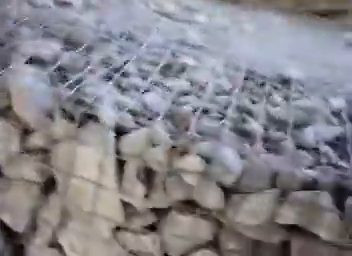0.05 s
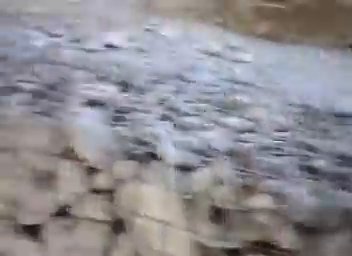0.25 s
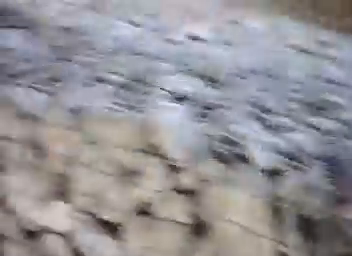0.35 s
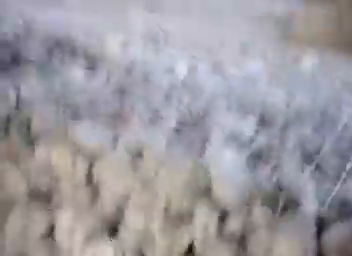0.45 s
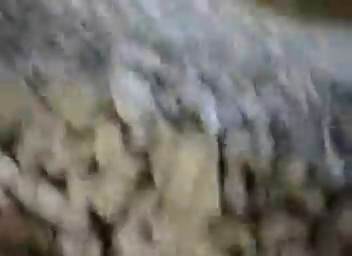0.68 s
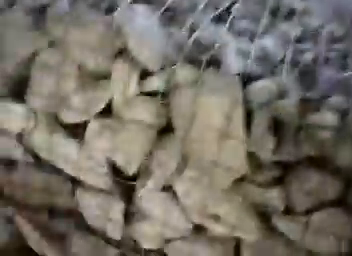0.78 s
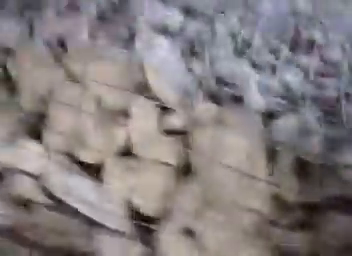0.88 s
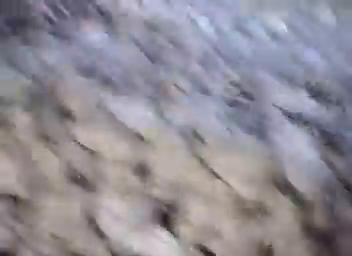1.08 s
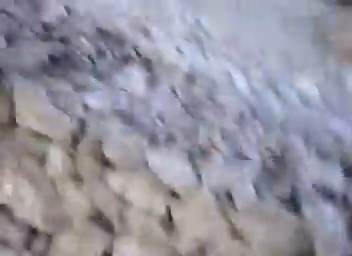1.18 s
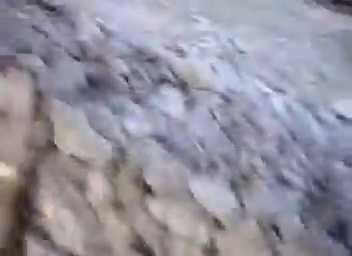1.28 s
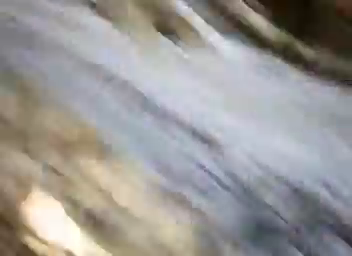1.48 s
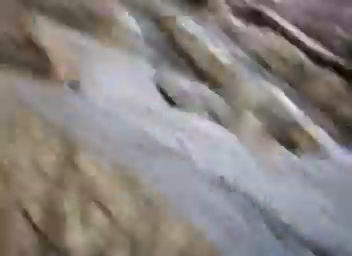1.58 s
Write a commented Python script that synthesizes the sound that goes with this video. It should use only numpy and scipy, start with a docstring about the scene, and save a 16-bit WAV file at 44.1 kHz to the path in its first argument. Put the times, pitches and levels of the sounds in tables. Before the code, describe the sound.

A bicycle slams onto stony ground at about 0.2 seconds, with a loud bang of crunching stones, a low thud and clanking metal that overloads the small microphone. It bounces twice, near 0.3 and 0.4 seconds, and rattles to rest by 0.5. A dull echo fades off the slope. Quieter, steady wind runs from the start until about 1.5 seconds, with soft puffs. Everything sounds hollow and nasal.

```python
"""Steady wind, then a bicycle slams onto stony ground, bounces twice and rattles to rest.
Each blow layers a crunch of stones, a low thud and a clank of the ringing frame. Bright ticks sharpen
the crash, the slope throws back a dull wash, and soft puffs dot the wind. It all has the hollow, nasal
colour of a small camera's microphone, which overloads on the bang and holds coarse samples for grit."""
import sys
import numpy as np
from scipy.fft import rfft, irfft
from scipy.io import wavfile

SR = 44100
rng = np.random.default_rng(int(sys.argv[2]) if len(sys.argv) > 2 else 0)


def to_wav(sig):
    """Store sig (one row per channel, or 1-D mono) as 16-bit WAV at the path in sys.argv[1].

    Samples outside -1..1 are clipped; the rate is SR.
    """
    pcm = np.clip(np.atleast_2d(sig), -1, 1) * 32767
    pcm = np.round(pcm).astype(np.int16)
    wavfile.write(sys.argv[1], SR, pcm.T)  # frames by channels


N = 72765

# Noise colours, as relative spectral density: f/Hz, level/dB
WIND_SPECTRUM = [(20, -22.5), (65, -27), (140, -18), (310, -20.5), (480, -16.5), (640, -11), (790, -2),
                 (880, 0.5), (1050, -9), (1300, -16.5), (1550, -26), (1870, -15.5), (2250, -27),
                 (2700, -23.5), (3400, -23.5), (3950, -30)]  # hollow rush at the microphone
BUFFET_SPECTRUM = [(15, 13.5), (35, 0), (70, -10), (200, -31), (1000, -68)]  # rumble of a buffet
ECHO_SPECTRUM = [(30, -28.5), (170, -30), (280, -15), (480, -8), (820, -0.5), (1100, -4), (1500, -23.5),
                 (1850, -16.5), (2300, -32.5), (3100, -19), (3900, -45.5)]  # dull wash off the slope
CRUNCH_SPECTRUM = [(30, -46.5), (150, -31), (300, -25), (550, -11.5), (820, 2), (1100, -3.5), (1450, -17),
                   (1850, -6), (2300, -21), (3100, -11), (3900, -16.5)]  # stones giving way
THUD_SPECTRUM = [(15, 6), (35, -18.5), (70, -6.5), (140, -1.5), (240, -4.5), (500, -7.5), (2000, -64)]  # low body of a blow
# Low buffets of wind: t/s, length/s, level/dB
BUFFETS = [(0.861, 0.037, -41), (0.923, .17, -45)]
# Soft, hollow puffs: t/s, level/dB
PUFFS = [(0.574, -17.5), (0.628, -19), (0.642, -16), (1.035, -20.5), (1.388, -20.5), (1.469, -18)]
# Bright ticks, sharp in the crash and faint after it: t/s, level/dB
TICKS = [(0.2332, 8), (0.2362, 6.5), (0.2506, 6.5), (0.2556, 7.5), (0.2873, 3), (0.3695, 6), (0.972, -14),
         (1.083, -15.5)]
# Stones crushed and scraped under the bicycle: t/s, level/dB, decay/s, hump f/Hz, hump lift/dB
CRUNCHES = [(0.2140, 6, .012, 830, -6), (0.2282, 0.5, 0.022, 800, 6.5), (0.2420, -3.5, 0.0058, 780, 8.5),
            (0.2815, -2.5, 0.014, 1090, 4), (0.2890, -6, 0.013, 960, 5.5), (0.3142, -12, 0.0027, 890, 13),
            (0.3440, -16.5, 0.036, 676, 27), (0.36, -7, .007, 720, 12.5), (0.3690, -8, 0.0098, 710, 6.5),
            (0.3817, -11, 0.0027, 730, 27), (0.4050, -21.5, 0.026, 810, 0.5),
            (0.4290, -13.5, 0.029, 970, 8.5), (0.4660, -19, 0.01, 774, 14), (0.4870, -21, 0.016, 686, 12)]
# Ringing modes of the frame: f/Hz, level/dB
FRAME_MODES = [(235, -20.5), (328, -16), (456, -8), (550, -5.5), (682, -5), (790, -9.5), (828, -4.5),
               (885, -10), (957, -5), (1006, -13.5), (1088, -10), (1216, -27), (1290, -18.5), (1361, -9.5),
               (1535, -13.5), (1857, -18)]
# The frame hits the ground: t/s, ring level/dB, most excited f/Hz, spread/Hz, thud level/dB
STRIKES = [(0.2133, -1.5, 828, 13, -14), (0.2818, -10, 1020, 92, -23), (0.3624, -8.5, 781, 19, -41),
           (0.4275, -25, 985, 120, -45), (0.4870, -24, 731, 75, -32)]


def amp(db):
    """Decibels to gain."""
    return 10 ** (np.asarray(db) / 20)


def unit_rms(x):
    """Scales to rms 1."""
    return x / np.sqrt(np.mean(x ** 2) + 1e-20)


def add(mix, start_s, sound):
    """Drops a sound into the mix at its cue."""
    part = mix[max(round(start_s * SR), 0):][:len(sound)]
    part += sound[:len(part)]


def noise(spectrum, hump_hz=800, hump_db=0, width_octaves=0.34):
    """Coloured noise of rms 1; an optional broad hump makes it hollow."""
    hz = np.fft.rfftfreq(N, 1 / SR) + 1
    points_hz, points_db = np.transpose(spectrum)
    colour = np.interp(np.log(hz), np.log(points_hz), points_db)
    hump = hump_db * np.exp(-.5 * (np.log2(hz / hump_hz) / width_octaves) ** 2)
    return unit_rms(irfft(rfft(rng.standard_normal(N)) * amp(colour + hump), N))


def wobble(depth_db, length_s):
    """A gain that wanders at random on the given time scale."""
    hz = np.fft.rfftfreq(N, 1 / SR)
    drift = irfft(rfft(rng.standard_normal(N)) * np.exp(-(2 * hz * length_s) ** 2), N)
    return amp(depth_db * unit_rms(drift))


def wind(level_db=-29):
    """The bed: air rushes past the microphone, hollow and fluttering, with low buffets."""
    out = amp(level_db) * unit_rms(noise(WIND_SPECTRUM) * wobble(depth_db=.8, length_s=.01))
    for start_s, length_s, db in BUFFETS:
        swell = np.sqrt(abs(np.hanning(round(length_s * SR))))
        add(out, start_s, amp(db) * swell * noise(BUFFET_SPECTRUM)[:len(swell)])
    return out


def hollow_puffs(hz=821, peak_s=0.0029):
    """Soft, hollow puffs in the tail of the crash and in the wind."""
    t, out = np.arange(SR // 10) / SR, np.zeros(N)
    puff = t / peak_s * np.exp(1 - t / peak_s) * np.sin(2 * np.pi * hz * t)
    for start_s, db in PUFFS:
        add(out, start_s, amp(db) * puff)
    return out


def slope_echo(gain_db=-7, rise_s=0.12, t60_s=1.0):
    """The tail: a dull, dying wash of noise for the crash scattering back from the rocks."""
    t, out = np.arange(N) / SR, np.zeros(N)
    envelope = (1 - np.exp(-t / rise_s)) * amp(-60 * t / t60_s)
    crash_s = STRIKES[0][0]
    add(out, crash_s, amp(gain_db) * noise(ECHO_SPECTRUM) * envelope)
    return out


def bright_ticks(hz=2680, decay_s=0.000078):
    """Bright ticks that die within a cycle: a sharp cluster in the crash, two faint ones later."""
    t, out = np.arange(SR // 10) / SR, np.zeros(N)
    tick = 2 * np.sin(2 * np.pi * hz * t) * np.exp(-t / decay_s)
    for start_s, db in TICKS:
        add(out, start_s, amp(db) * tick)
    return out


def stone_crunches(rise_s=0.00027):
    """Stones give way under the bicycle in short, grainy bursts."""
    t, out = np.arange(N) / SR, np.zeros(N)
    for start_s, db, decay_s, hump_hz, hump_db in CRUNCHES:
        grit = noise(CRUNCH_SPECTRUM, hump_hz, hump_db) * wobble(depth_db=2.5, length_s=0.0011)
        envelope = (1 - np.exp(-t / rise_s)) * np.exp(-t / decay_s)
        add(out, start_s, amp(db) * unit_rms(grit) * envelope)
    return out


def frame_ring(favoured_hz, spread_hz, favour_db=15, scatter_db=2.5):
    """The clank: where the blow lands decides which of the frame's modes ring loudest."""
    t, out = np.arange(N) / SR, np.zeros(N)
    for hz, db in FRAME_MODES:
        lift_db = favour_db * np.exp(-.5 * ((hz - favoured_hz) / spread_hz) ** 2)
        lift_db += scatter_db * rng.standard_normal()
        t60_s = .15 * np.sqrt(800 / hz)  # higher modes die sooner
        out += amp(db + lift_db - 60 * t / t60_s) * np.sin(2 * np.pi * hz * t)
    return out


def frame_strikes(rise_s=0.0021, thud_decay_s=0.013):
    """The bang and its bounces: each landing gives a low thud and sets the frame ringing."""
    t, out = np.arange(N) / SR, np.zeros(N)
    attack = 1 - np.exp(-t / rise_s)
    for start_s, ring_db, favoured_hz, spread_hz, thud_db in STRIKES:
        thud = amp(thud_db) * noise(THUD_SPECTRUM) * np.exp(-t / thud_decay_s)
        clank = amp(ring_db) * frame_ring(favoured_hz, spread_hz)
        add(out, start_s, attack * (thud + clank))
    return out


def scene():
    """The crash and its echo over the bed of wind, in mono."""
    crash = frame_strikes() + stone_crunches() + bright_ticks()
    return (crash + slope_echo() + hollow_puffs() + wind())[None]


def record(dry, hold_hz=8000, roll_off_hz=3800, edge_hz=9400, ceiling=0.92, knee=4.8, bias=0.1):
    """The camera's grit: coarse sampling, a slightly lopsided overload and a steep band limit."""
    count, hz = round(N * hold_hz / SR), np.fft.rfftfreq(N, 1 / SR)
    roll_off = np.sin(np.pi / 2 * np.clip((hold_hz / 2 - hz) / (hold_hz / 2 - roll_off_hz), 0, 1))
    coarse = irfft((rfft(dry[0]) * roll_off)[:count // 2 + 1], count) * count / N + bias
    clipped = coarse / (1 + abs(coarse / ceiling) ** knee) ** (1 / knee) - bias
    # Holding each sample mirrors the sound into the treble as a sheen.
    mirrored = np.fft.fft(clipped)[np.arange(len(hz)) % count]
    held = mirrored * np.sinc(hz / hold_hz) * N / count
    return irfft(held / np.sqrt(1 + (hz / edge_hz) ** 200), N)[None]


dry = scene()
out = record(dry)
to_wav(out)
```